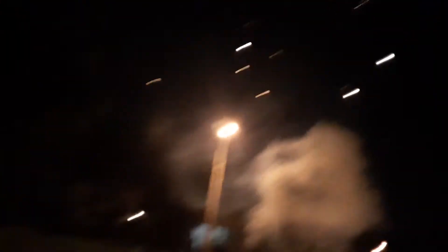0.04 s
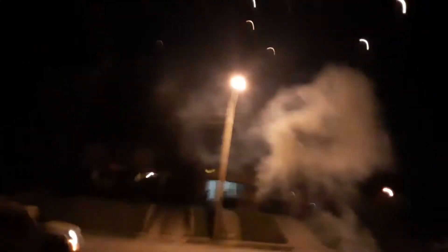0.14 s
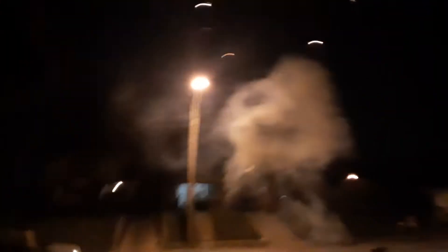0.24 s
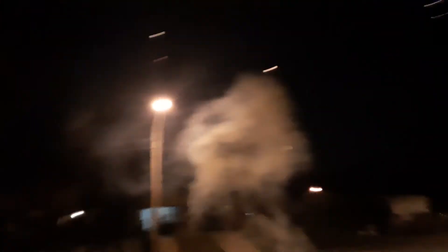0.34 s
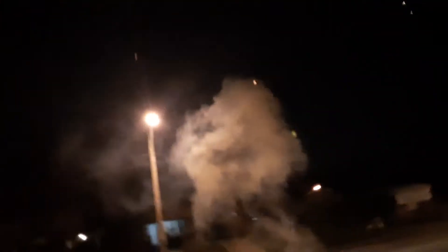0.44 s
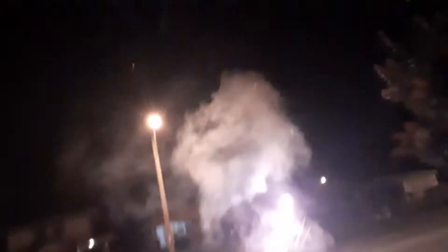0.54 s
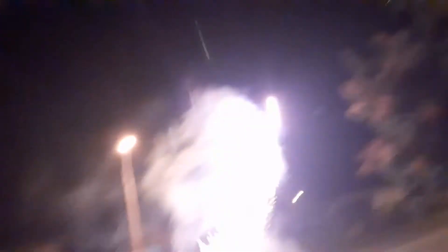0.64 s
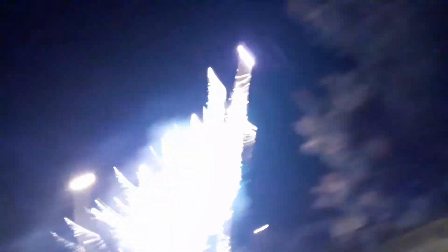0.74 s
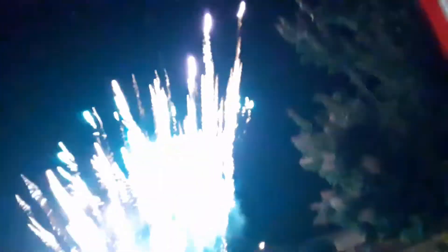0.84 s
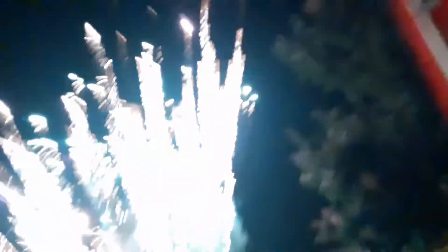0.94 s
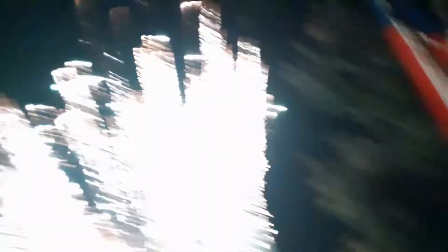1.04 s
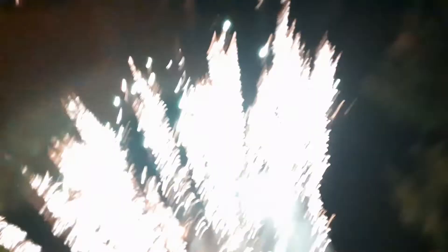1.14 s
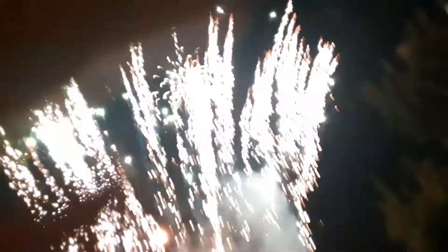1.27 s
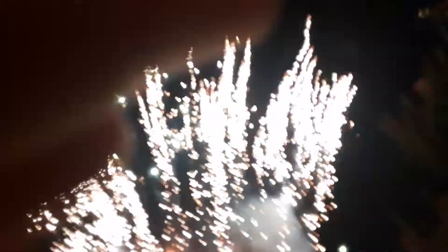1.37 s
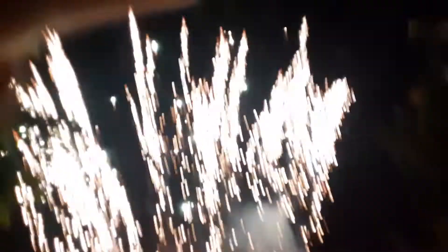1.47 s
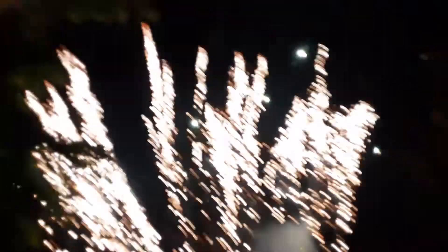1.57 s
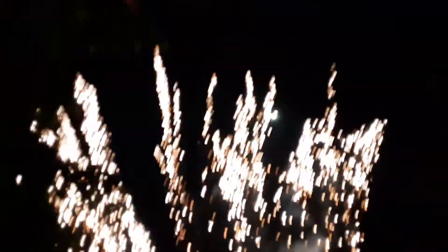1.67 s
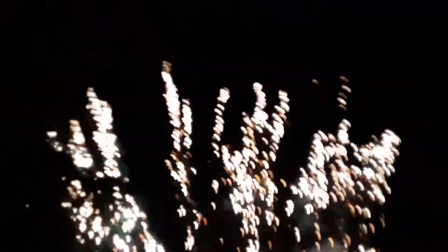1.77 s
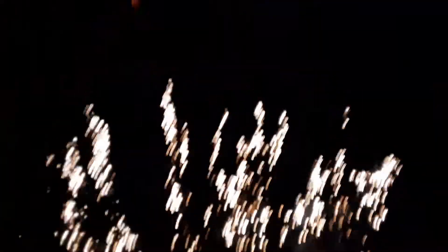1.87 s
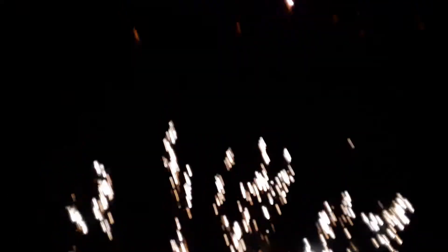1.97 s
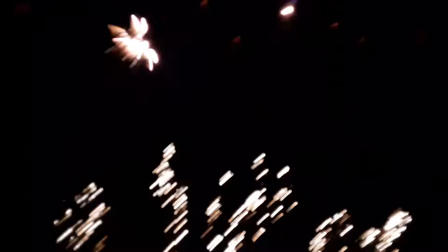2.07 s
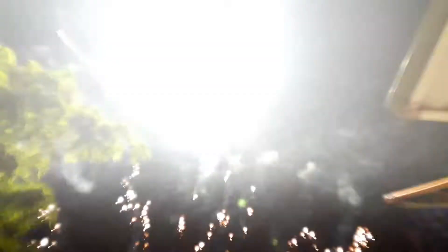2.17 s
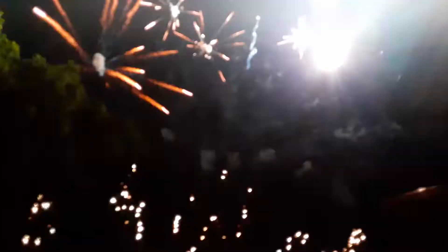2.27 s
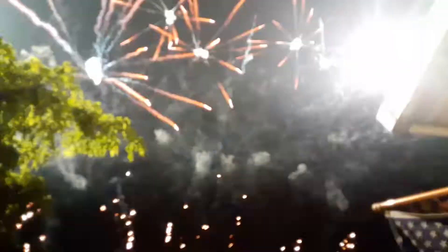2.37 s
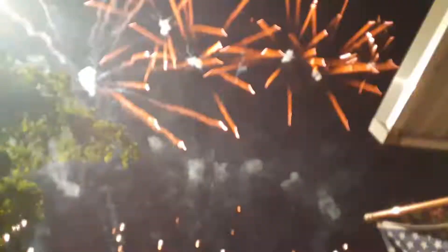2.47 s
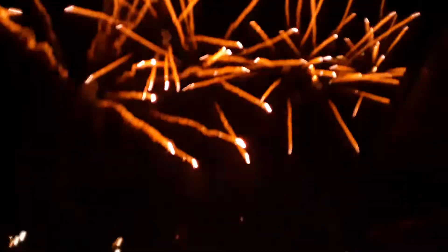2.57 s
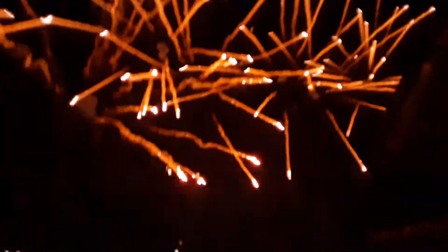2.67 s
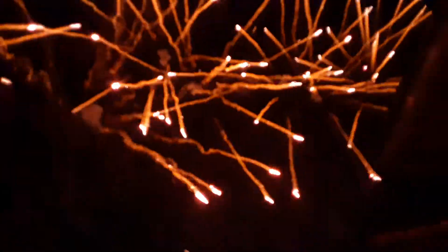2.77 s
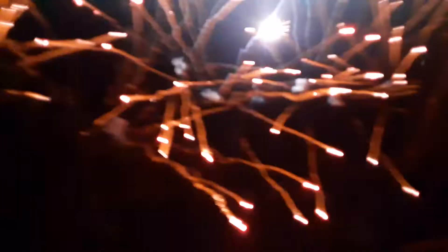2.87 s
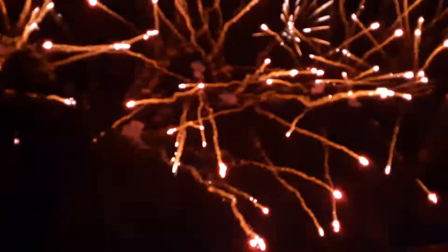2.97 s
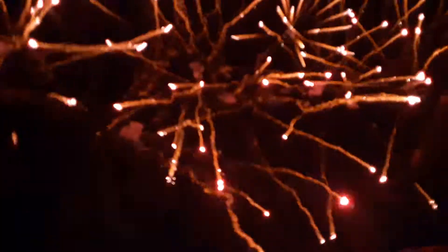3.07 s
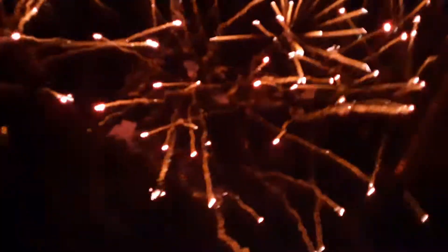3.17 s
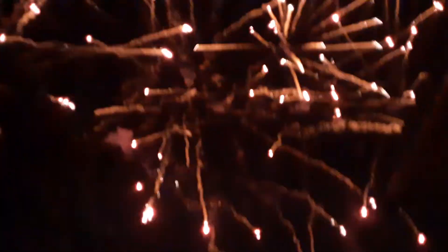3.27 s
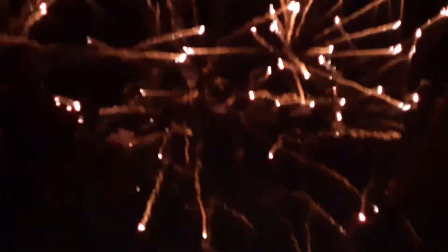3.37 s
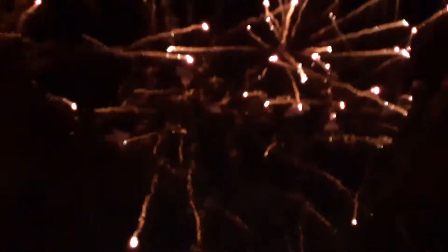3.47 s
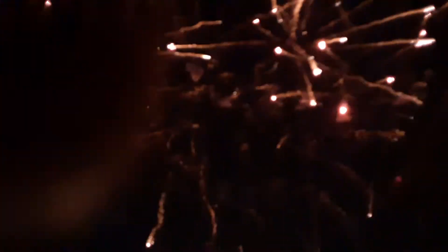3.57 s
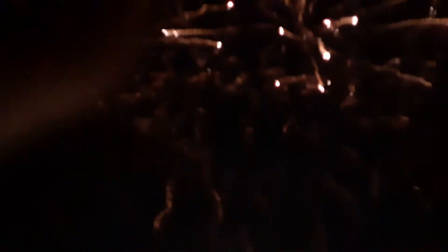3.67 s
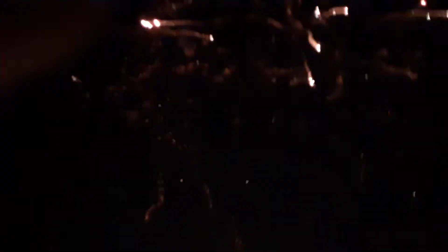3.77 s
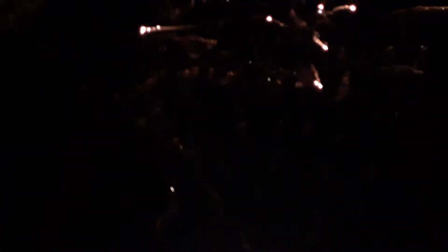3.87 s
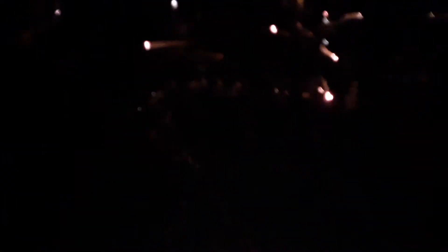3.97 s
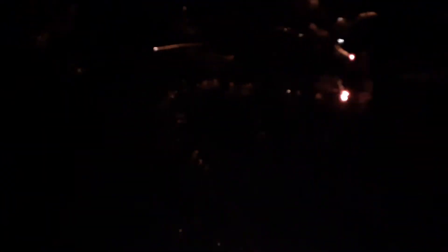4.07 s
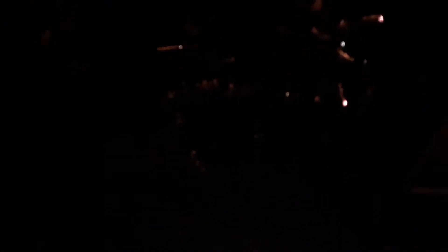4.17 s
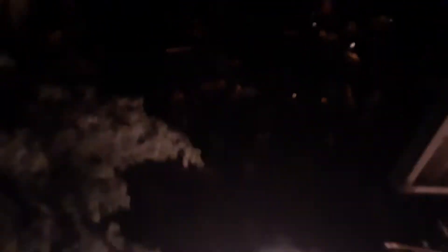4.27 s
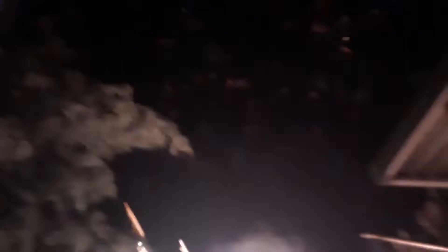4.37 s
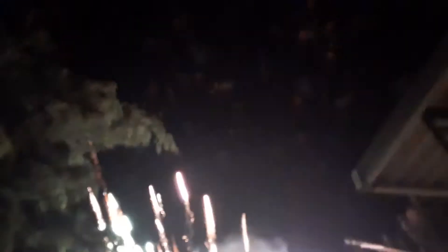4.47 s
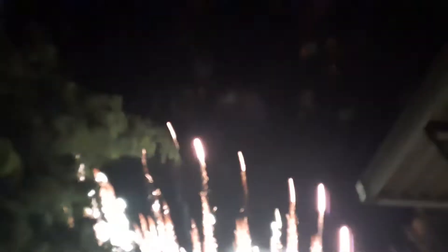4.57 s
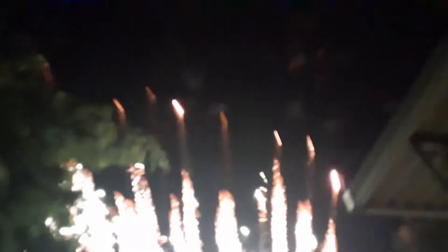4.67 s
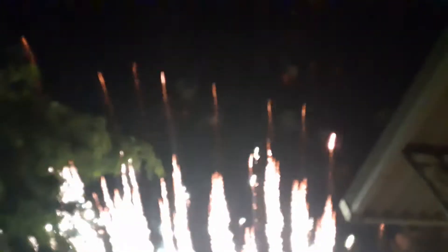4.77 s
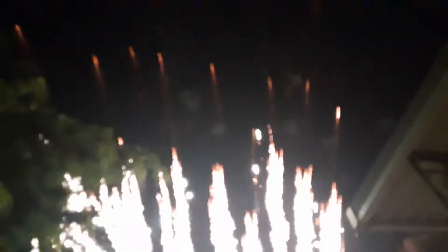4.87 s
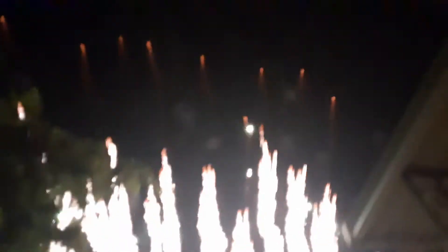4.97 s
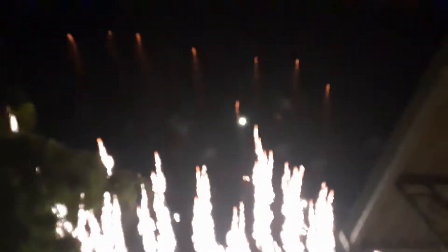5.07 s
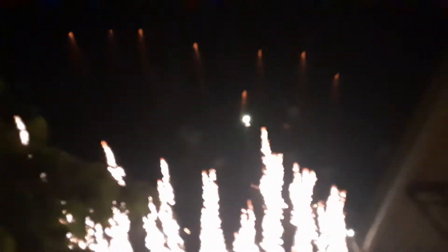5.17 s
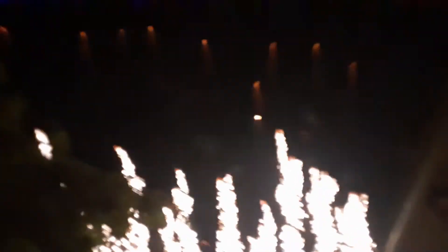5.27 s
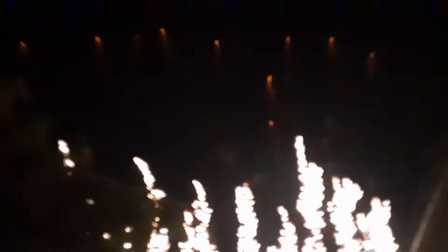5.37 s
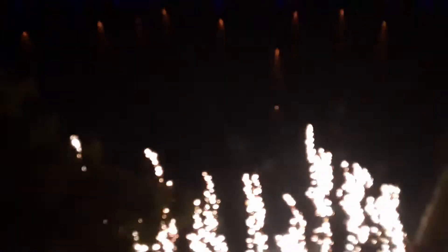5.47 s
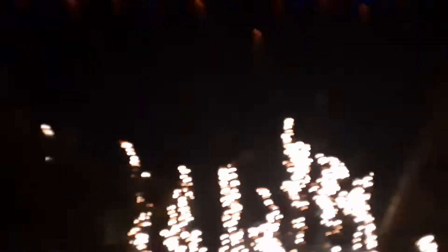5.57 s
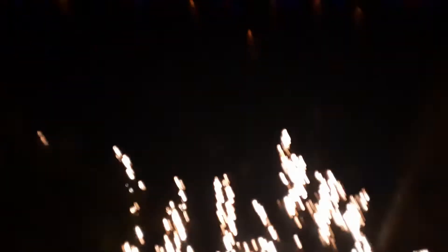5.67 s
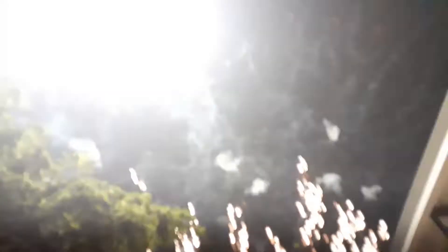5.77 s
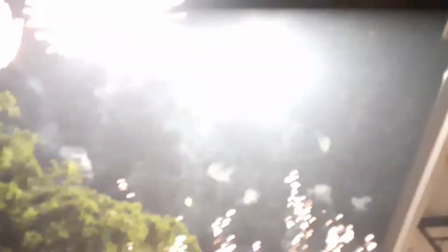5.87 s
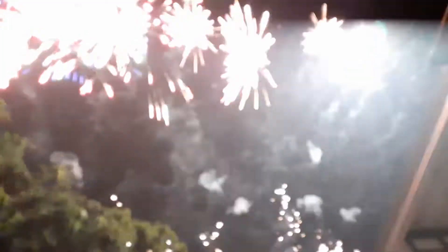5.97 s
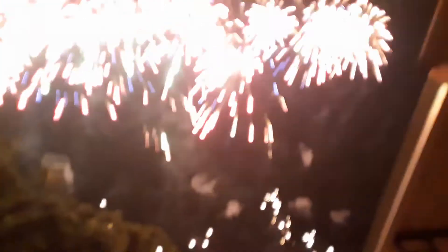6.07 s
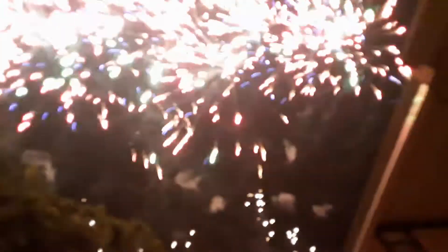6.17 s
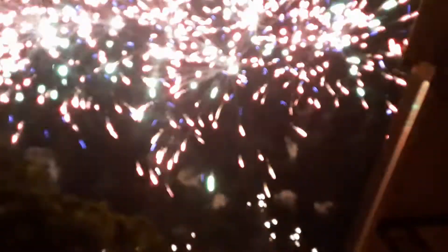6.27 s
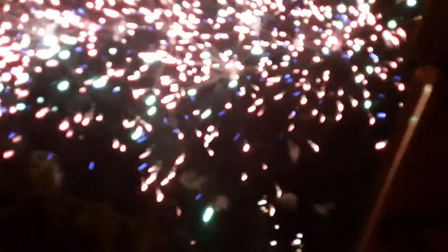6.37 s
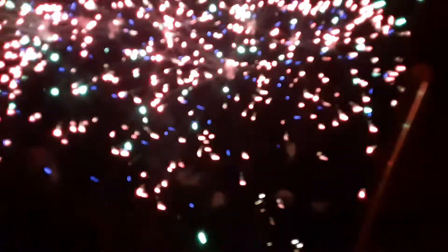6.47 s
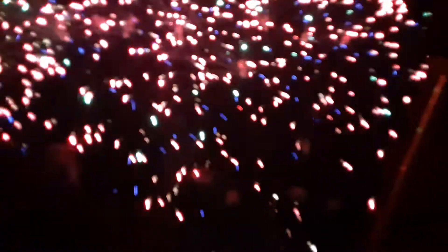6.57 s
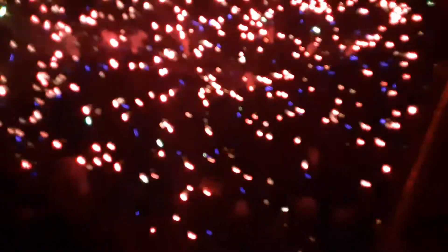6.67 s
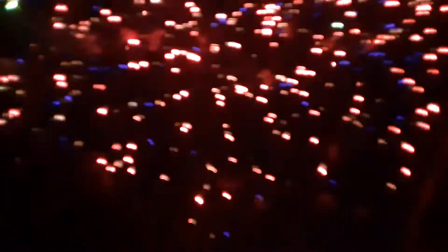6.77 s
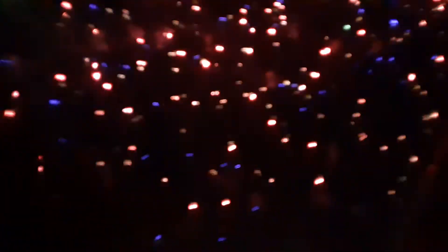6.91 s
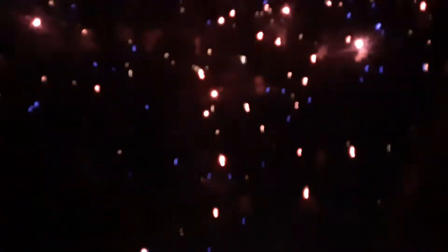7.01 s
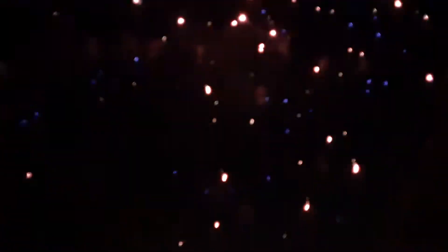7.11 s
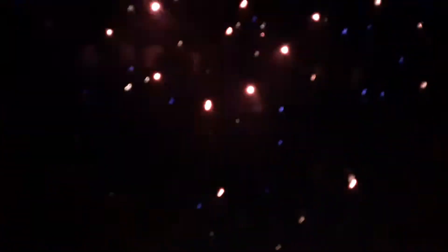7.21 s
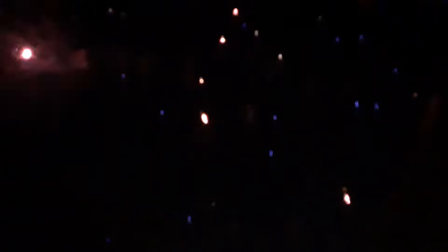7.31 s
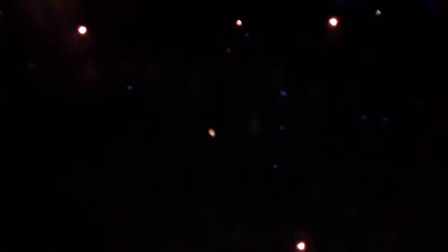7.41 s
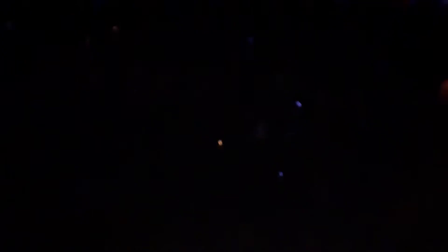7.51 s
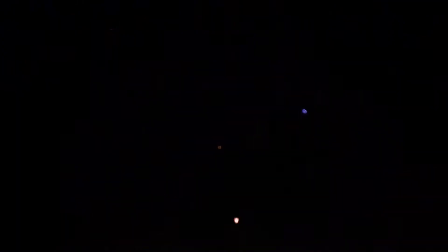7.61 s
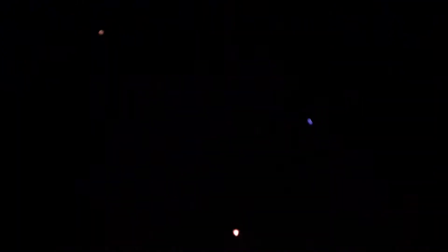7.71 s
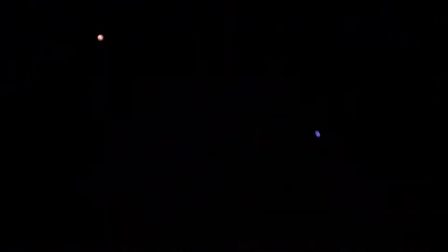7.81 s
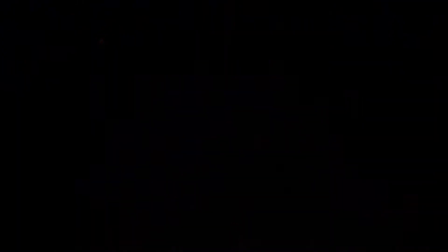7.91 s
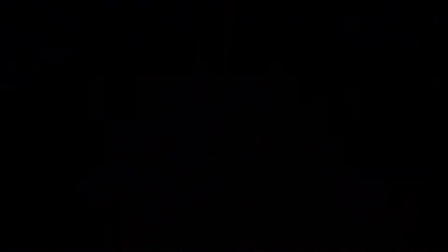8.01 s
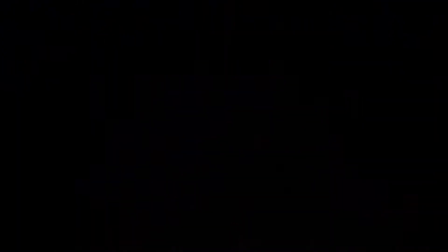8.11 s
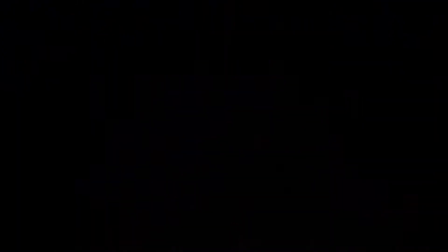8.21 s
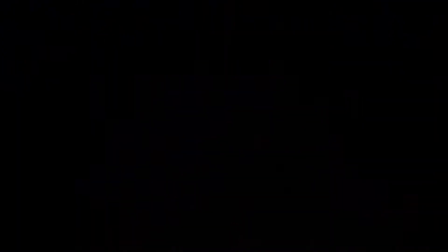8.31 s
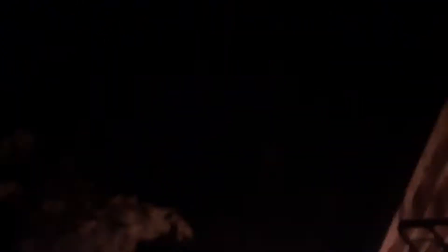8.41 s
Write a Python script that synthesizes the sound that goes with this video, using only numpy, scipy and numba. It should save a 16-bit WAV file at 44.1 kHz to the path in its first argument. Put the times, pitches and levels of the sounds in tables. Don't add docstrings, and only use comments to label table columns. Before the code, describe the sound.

A multi-shot firework a few metres away fires two fast ragged volleys, cracking and thumping from its tubes. About a second and a half after each, shells explode overhead in overlapping booms with duller distant thumps and grainy reverberation. Low rumble, air hiss, burning sizzle and a faint throbbing engine lie beneath. A handheld phone limits the peaks; the second volley is duller.

```python
import sys
import numpy as np
from scipy import signal
from scipy.fft import rfft, irfft, next_fast_len
from scipy.io import wavfile
from scipy.ndimage import uniform_filter1d, minimum_filter1d
from numba import njit

SR = 44100
rng = np.random.default_rng(int(sys.argv[2]) if len(sys.argv) > 2 else 0)


def transcribe(u):
    v = np.clip(np.atleast_2d(u).T, -1, 1)
    q = np.round(v * 32767).astype(np.int16)
    wavfile.write(sys.argv[1], SR, q)


def gain_from_decibels(decibels):
    exponent = np.asarray(decibels, float) / 20
    return 10 ** exponent


N = 372644

VOLLEY_STARTS = [.5605, 4.2354, 8.44]
# (frequency [Hz], density [dB per Hz])
BLAST_COLOUR = [(410, -6), (700, -2), (1110, 1), (2700, -2), (3320, -9), (4210, -8), (7200, -12),
                (9730, -26), (13100, -19), (16000, -32)]
NO_THUMP_DB, TUBE_NOTE_HZ = -60, 293.5


def at(table, hz, column=1):
    table = np.array(table, float)
    return np.interp(np.log(np.maximum(hz, 1)), np.log(table[:, 0]), table[:, column])


def bins(size):
    return np.arange(size // 2 + 1) * SR / size


def port_gain(pan_db):
    return gain_from_decibels(np.array([[pan_db], [-pan_db]]) / 2)


def noise(spectrum, shape):
    # (frequency [Hz], coherence [0-1])
    coherence = [(40, 0.6), (80, 1), (150, 0.96), (350, 0.82), (700, 0.31), (1400, 0), (16000, 0)]
    size = len(shape)
    hz = bins(size)
    mid, side = rfft(rng.standard_normal((2, size)) * shape) * gain_from_decibels(at(spectrum, hz))
    alike = np.clip(at(coherence, hz), 0, 1)
    mid, side = mid * np.sqrt(1 + alike), side * np.sqrt(1 - alike)
    x = irfft(np.array([mid + side, mid - side]), size)
    return x * np.sqrt(np.mean(shape ** 2) / np.mean(x ** 2))


def walk(rate, size):
    hold = int(SR / rate)
    steps = np.repeat(rng.standard_normal(300), hold)
    return 0.74 * uniform_filter1d(np.resize(steps, size), hold)


def band(x, hz, width):
    return signal.lfilter(*signal.iirpeak(hz, hz / width, fs=SR), x)


def flames():
    # (time of peak [s], level [dB], swell [dB per s], fade [dB per s])
    burns = [
        (1.45, -50.5, 12, 28.5),
        (3.499, -61, 5.5, 5),
        (4.22, -62, 17, 24),
        (4.9, -70, 36, 1),
        (8.45, -51.5, 29, 50),
    ]
    t, total = np.arange(N) / SR, 0
    for s, db, swell, fade in burns:
        slope_db = np.where(t < s, swell * (s - t), fade * (t - s))
        total = total + gain_from_decibels(db - slope_db)
    return total


def night_air(flame):
    # (time [s], level [dB])
    ambience = [(0, -43.5), (.3, -44.5), (.46, -40), (.56, -37), (1.5, -46), (2.1, -45.5), (3.5, -48.5),
                (4.3, -40), (5.4, -50), (5.65, -47.5), (5.9, -43), (7.1, -49.5), (7.5, -46.5), (7.9, -44),
                (8.45, -34)]
    # (frequency [Hz], density [dB per Hz])
    rumble_colour = [(15, -67), (25, -14), (65, -9.5), (107, -4), (170, -8.5), (335, -3.5), (401, -9.5),
                     (583, -16.5), (697, -17.5), (900, -32), (1170, -41), (1980, -120)]
    # (frequency [Hz], density [dB per Hz])
    hiss_colour = [(290, -56), (500, -19), (733, -6), (833, -0.5), (1180, -2.5), (1320, -3.5), (2160, -3.5),
                   (3430, -21.5), (6490, -31), (8000, -41), (10400, -61), (17600, -120)]
    hiss_db, thinning_db_per_s, roar_db = -7, -0.76, 4
    t, even = np.arange(N) / SR, np.ones(2 ** 19)
    air_db = np.interp(t, *np.transpose(ambience))
    rumble = noise(rumble_colour, even)[:, :N] * gain_from_decibels(air_db + 2.2 * walk(12, N))
    hiss_level = np.hypot(gain_from_decibels(air_db + hiss_db + thinning_db_per_s * t), gain_from_decibels(roar_db) * flame)
    hiss = noise(hiss_colour, even)[:, :N] * hiss_level * gain_from_decibels(2.2 * walk(31, N))
    return rumble + hiss


def engine():
    # (time [s], level [dB])
    engine_level = [(0, -54), (.5, -51.5), (1.9, -48), (3.5, -44.5), (4.2, -36.5), (5.0, -47), (6.8, -49.5),
                    (7.4, -63), (8.45, -38)]
    phase = 2 * np.pi * np.cumsum(110 + 9 * walk(14, N) + 6 * walk(1.5, N)) / SR
    throb = 1 + .6 * np.sin(phase / 6 + 4 * walk(4, N))
    level_db = np.interp(np.arange(N) / SR, *np.transpose(engine_level))
    return np.sin(phase) * throb * gain_from_decibels(level_db + 3.4 * walk(20, N))


def fuse(flame):
    # (frequency [Hz], density [dB per Hz])
    sizzle_colour = [(1470, -29), (2500, -4.5), (3520, -3.5), (3830, -5.5), (4690, -7), (6450, -10.5),
                     (8200, -13), (9360, -33), (12300, -20.5), (16000, -28)]
    whistle_db, growth_db_per_s = -40, 30
    sizzle = noise(sizzle_colour, np.ones(2 ** 19))[:, :N] * flame * gain_from_decibels(1.0 * walk(280, N))
    to_shot = np.arange(N) / SR - VOLLEY_STARTS[0]
    whistle = band(rng.standard_normal(N), 3080, 50)
    whistle = whistle * gain_from_decibels(whistle_db + growth_db_per_s * np.minimum(to_shot, 0)) * (to_shot < 0)
    return sizzle + whistle


def tail(spectrum, roll, rise, grain_db, rate, size):
    t, hz = np.arange(size) / SR, bins(size)
    sound = rfft(noise(spectrum, np.ones(size)))
    clumps, out = walk(rate, size), 0
    for centre in 31.25 * 2 ** np.arange(10):
        share = np.clip(1 - abs(np.log2(np.maximum(hz, 1) / centre)), 0, 1)
        early, late, late_db = (at(roll, centre, column=c) for c in (1, 2, 3))
        decay = np.sqrt(gain_from_decibels(-120 * t / early) + gain_from_decibels(2 * late_db - 120 * t / late))
        build = 1 - np.exp(-t / rise * max(centre / 400, 1))
        grain = gain_from_decibels(grain_db * (clumps + 0.25 * walk(rate, size)))
        out = out + irfft(sound * share, size) * decay * build * grain
    return out


def bangs(events, colour, echoes, roll, crack_s, lag_s, ring_s, boom_db, spit_db,
          dip_s=0., shock_db=-3, shock_s=0.00033, rise_s=.0001):
    aimed_away = [.6162, .639, .7101, .7887, .817, 2.266, 2.325, 4.2542, 6.029, 8.1184, 8.2082, 4.297,
                  4.3005, 4.3195, 4.3478, 4.4403, 4.4585]
    away_hz, away_share = 3900, .35
    crack_width, crack_crest, even_colour, echo_spread = .85, 1.55, .6, .03
    size, lead = 2 ** 12, 2 ** 9
    t = (np.arange(size) - lead) / SR
    after = np.maximum(t, 0)
    front = (t >= 0) * (np.exp(-(after / crack_s) ** 2) + .15 * np.exp(-after / (4 * crack_s)))
    front = front * (1 - np.exp(-after / rise_s))
    spit = gain_from_decibels(spit_db) * np.exp(np.minimum(t, 0) / .008) * (t < 0) * (t > -.0065)

    late = np.maximum(t - lag_s, 0)
    ring = np.exp(-late / ring_s) + 0.098 * np.exp(-late / (4 * ring_s))
    ring = ring * (1 - np.exp(-(late / (.0003 + .72 * dip_s)) ** 2))
    boom = np.sin(2 * np.pi * 105 * late + np.array([[.85], [-.7]]))
    boom = boom * np.exp(-late / .009) * (1 - np.exp(-late / .003))

    even = gain_from_decibels(at(colour, bins(size)))
    shock = np.roll(irfft(even, size), lead + int(shock_s * SR))
    shock = gain_from_decibels(shock_db) * shock / shock.max()
    gate = np.minimum(np.exp(np.minimum(t, 0) / .0002) + gain_from_decibels(spit_db + 22), 1)
    paths, feed = np.zeros((1 + len(echoes), 2, N + SR)), np.zeros((1, N))
    for s, crack_db, thump_db, hz, pan_db, tail_db in events:
        crack = noise(colour, (front + spit) * gain_from_decibels(0.21 * walk(3000, size)))
        tone = rfft(crack)
        levelling = (even / uniform_filter1d(abs(tone), size=31)) ** even_colour
        crack = irfft(tone * levelling, size) * np.exp(-after / (5 * crack_s))
        mid = crack.mean(axis=0)
        crack = mid + crack_width * (crack - mid)
        crack = crack * np.sqrt(np.sum(front ** 2) / np.sum(mid ** 2)) / crack_crest
        crack = (crack + shock) * gate
        if s in aimed_away:
            crack = away_share * crack + signal.lfilter(*signal.butter(3, away_hz, fs=SR), crack)
        thump = np.sin(2 * np.pi * hz * (late - dip_s)) * ring + gain_from_decibels(boom_db) * boom
        bang = gain_from_decibels(crack_db - 2.0) * crack + gain_from_decibels(thump_db + 3) * thump
        stretch = 1 + echo_spread * rng.standard_normal()
        for path, delay in zip(paths, [0] + [row[0] for row in echoes]):
            i = int((s + delay * stretch) * SR) - lead
            path[:, i:i + size] += bang * port_gain(pan_db)
        feed[0, int(s * SR)] = gain_from_decibels(tail_db)
    out = paths[0, :, :N] + signal.fftconvolve(feed, roll, axes=1)[:, :N]
    for path, (delay, hz, width, db) in zip(paths[1:], echoes):
        out = out + gain_from_decibels(db) * band(band(path[:, :N], hz, width), hz, 2 * width)
    return out, feed


def thump_note(hz):
    return hz + 20 * rng.standard_normal()


def sky_pan():
    return -0.5 + 4 * rng.standard_normal()


def far_reverberation():
    # (frequency [Hz], density [dB per Hz])
    far_colour = [(24, -43), (40, -14), (227, 3), (271, -8), (314, 9.5), (493, -17), (979, -24),
                  (2600, -33), (3000, -41), (3900, -69.5), (6600, -120)]
    # (frequency [Hz], early t60 [s], late t60 [s], late share [dB])
    far_decay = [(100, 0.27, 0.89, -8.5), (1000, 0.073, 1, -2)]
    return tail(far_colour, far_decay, rise=0.0087, grain_db=0.0, rate=19, size=2 ** 16)


def far_bangs(roll):
    # (time [s], thump [dB], thump note [Hz], tail [dB])
    distant = [(0.507, -34, 350, -45), (2.755, -12, 327, -28.5), (2.879, -20, 294, -42),
               (3.19, -19.5, 334, -31), (3.41, -31, 320, -30), (5.547, -31.5, 105, -54),
               (5.686, -38, 206, -46), (6.322, -14.5, 357, -45), (6.433, -20.5, 343, -44),
               (7.031, -38, 350, -43), (8.063, -26, 336, -25.5), (8.085, -29, 283, -47),
               (8.105, -33, 300, -35), (8.158, -43, 319, -37), (8.307, -36, 318, -53),
               (5.9418, -12, 334, -34), (5.957, -12.5, 320, -41), (5.968, -21, 315, -28),
               (6.037, -18, 320, -45), (6.107, 1, 332, -49), (6.137, -9.5, 273, -47),
               (6.275, -19, 278, -52), (2.408, -17, 346, -45), (2.562, -7, 302, -47),
               (2.654, -17, 315, -42), (2.71, -26, 301, -45), (6.2291, -6.5, 329, -45),
               (6.151, -13, 315, -45), (6.184, -11, 325, -45), (2.1275, -13, 310, -47),
               (2.2983, -9, 333, -47), (2.313, -14, 300, -47), (2.328, -12, 290, -47),
               (2.386, -15, 319, -47), (2.525, -12, 310, -49), (2.629, -9.5, 320, -47),
               (5.9142, -11, 315, -47), (6.016, -10, 310, -47), (6.071, -14, 320, -47)]
    far_crack_db = -35
    rows = [(s, thump + far_crack_db, thump, hz, sky_pan(), wash) for s, thump, hz, wash in distant]
    return bangs(rows, BLAST_COLOUR, [], roll, crack_s=0.0018, lag_s=0.00053, ring_s=0.01,
                 boom_db=-19.0, spit_db=-14)[0]


def stray_cracks(roll):
    # (time [s], crack [dB], left minus right [dB])
    stray_events = [(2.3145, -15, 0), (2.3855, -14, 0), (2.42, -16, 0), (2.4305, -13, 0), (2.545, -18, 0),
                    (4.372, -17, 0), (4.434, -15, 0), (5.9435, -15, 0), (6.024, -14, 0), (6.116, -15, 0),
                    (8.1184, -38, 0), (8.2082, -38, 2), (8.4335, -28, 0)]
    rows = [(s, crack, NO_THUMP_DB, TUBE_NOTE_HZ, pan, crack - 40) for s, crack, pan in stray_events]
    return bangs(rows, BLAST_COLOUR, [], roll, crack_s=.0015, lag_s=.001, ring_s=.003,
                 boom_db=-9, spit_db=-60)[0]


def pings():
    # (time [s], peak [dB], pitch [Hz], left minus right [dB])
    ribbed_returns = [(1.1453, -31, 2240, 6), (1.2012, -36, 2100, 6), (2.139, -16, 2250, -4),
                      (2.5051, -25, 2150, 0), (2.5155, -14.5, 2010, 9), (2.6436, -15.5, 2070, 10),
                      (3.0976, -20, 1440, 4), (4.9095, -45, 1640, 0), (4.9734, -42, 2000, 0),
                      (4.9955, -39, 1700, 0), (5.021, -37, 1730, 0), (8.1184, -41, 2580, -2),
                      (8.2082, -41, 2490, 2)]
    t, out = np.arange(2 ** 10) / SR, np.zeros((2, N))
    for s, db, hz, pan_db in ribbed_returns:
        blip = np.sin(2 * np.pi * hz * t) * t / 0.0011 * np.exp(1 - t / 0.0013)
        i = int(s * SR)
        out[:, i:i + len(t)] += blip * gain_from_decibels(db - 1.0) * port_gain(pan_db)
    return out


def near_reverberation():
    # (frequency [Hz], density [dB per Hz])
    near_colour = [(180, -14), (300, 6), (856, 1), (1560, -1), (1690, 12.5), (1970, 6), (6300, -1),
                   (10000, -21.5), (16000, -24)]
    # (frequency [Hz], early t60 [s], late t60 [s], late share [dB])
    near_decay = [(300, 0.18, 0.11, -6), (3000, 0.2, 0.46, -4.5), (14100, 0.098, 0.28, 14)]
    return tail(near_colour, near_decay, rise=0.0013, grain_db=4, rate=106, size=2 ** 15)


def hill_echo(feed, roll):
    delay = int(1.452 * SR)
    smear = roll * np.minimum(np.arange(2 ** 15) / (0.012 * SR), 1)
    hill = signal.fftconvolve(np.pad(feed, ((0, 0), (delay, 0))), smear, axes=1)
    return gain_from_decibels(-29) * band(hill[:, :N], 2150, 410)


def star_snaps(roll):
    # (time [s], crack [dB], left minus right [dB], tail [dB])
    snap_events = [
        (1.2893, -10, -4, -31),
        (1.2967, -15, 6, -35),
        (1.3012, -11, -7, -35),
        (1.306, -11, 7, -33),
        (1.3134, -14, 3, -34),
        (4.1057, -39, 3, -62),
    ]
    # (frequency [Hz], density [dB per Hz])
    snap_colour = [(200, -8), (800, 0), (1800, 0), (6500, -3), (9700, -15.5), (13000, -13), (16000, -56)]
    rows = [(s, crack, NO_THUMP_DB, TUBE_NOTE_HZ, pan, wash) for s, crack, pan, wash in snap_events]
    return bangs(rows, snap_colour, [], roll, crack_s=.001, lag_s=.001, ring_s=.003, boom_db=-9,
                 spit_db=-60, shock_db=3, shock_s=.0001, rise_s=.00003)[0]


def shell_bursts():
    # (time [s], crack [dB], thump [dB], tail [dB])
    burst_events = [(2.1185, -3, -6, -10.5), (2.266, -13, -11, -15), (2.2968, -1, -3.5, -14),
                    (2.325, -14, -12, -17), (2.377, 0, -4, -14), (2.3955, -11, -9, -18),
                    (2.412, -10, -8, -18), (2.4925, -6, -6, -12), (2.6212, -2, -4, -14),
                    (3.0, -7, -4.5, -14), (5.9057, -3, -4, -10), (5.9323, -12, -8, -17),
                    (6.0066, -3, -4, -12), (6.029, -8, -9, -17), (6.063, -8, -8, -16), (6.1, -4, -7, -15),
                    (6.1643, -9, -8, -21), (6.177, -8, -8, -22), (6.2275, -24, -12, -27)]
    # (delay [s], centre [Hz], width [Hz], level [dB])
    burst_reflections = [(.0089, 450, 1400, 1), (.0089, 4500, 7000, -6), (.0185, 400, 1000, -4),
                         (.031, 320, 600, -8), (.053, 330, 900, -8), (.135, 700, 1500, -14)]
    # (frequency [Hz], density [dB per Hz])
    burst_colour = [(18, -80), (30, -48), (93, -6.5), (199, -8.5), (328, 0), (404, -6.5), (512, -9.5),
                    (616, -14.5), (866, -23), (1500, -27), (2230, -26.5), (3100, -31.5), (7270, -36.5),
                    (9460, -52), (12600, -50), (16000, -54)]
    # (frequency [Hz], early t60 [s], late t60 [s], late share [dB])
    burst_decay = [(40, 0.48, 2.74, -20), (294, 0.44, 1.89, -10), (1550, 0.69, 1.804, 1),
                   (6160, 0.37, 1.71, -3), (14600, 1, 0.48, 11)]
    roll = gain_from_decibels(2.0) * tail(burst_colour, burst_decay, rise=.02, grain_db=1.0, rate=45, size=2 ** 17)
    rows = [(s, crack, thump, thump_note(279), sky_pan(), wash) for s, crack, thump, wash in burst_events]
    return bangs(rows, BLAST_COLOUR, burst_reflections, roll, crack_s=.002, lag_s=.0009, ring_s=.0025,
                 boom_db=-6, spit_db=-55, shock_db=-2, shock_s=.0017, rise_s=.0003)[0]


def lift_charges():
    # (time [s], crack [dB], thump [dB], left minus right [dB])
    lift_events = [(.5605, -7, -6, -2), (.5906, -6, -6, 1), (.6162, -7, -5, 0), (.639, -7, -4.5, -1),
                   (.6628, -8, -15, 0), (.666, -7, -6, 3), (.685, -8, -5.5, 2), (.7101, -4, -4, 1),
                   (.7384, -5, -7, -1), (.768, -7, -6, -3), (.7887, -7, -14, 3), (.7966, -6, -6, -3),
                   (.817, -12, -15, 3), (4.2354, -7, -5, 2), (4.2542, -8, -6, -2), (4.2767, -4, -6, 3),
                   (4.297, -7, -8, -2), (4.3005, -8, -9, 4), (4.3195, -7, -11, -1), (4.3283, -5, -5.5, -2),
                   (4.3478, -9, -9, 3), (4.3545, -18, -5.5, -2), (4.3764, -4, -5.5, -1),
                   (4.3953, -7, -6, 3), (4.4143, -6, -5, 1), (4.4403, -10, -5.5, 1), (4.4585, -12, -11, -2),
                   (8.4406, -5, -6, 1)]
    # (frequency [Hz], density [dB per Hz])
    muzzle_colour = [(400, -6), (560, -2.5), (800, 2.5), (2000, -3), (3400, -4.5), (4600, -10),
                     (7200, -9.5), (9700, -25.5), (13000, -16.5), (16000, -37)]
    # (delay [s], centre [Hz], width [Hz], level [dB])
    ground_reflection = [(.0027, 2800, 2400, -6)]
    # (frequency [Hz], density [dB per Hz])
    lift_colour = [(18, -79), (30, -14), (100, -1.5), (150, -4.5), (215, -4), (336, -3.5), (450, -15),
                   (554, -19), (800, -20), (2170, -21), (2610, -28), (3140, -25.5), (4080, -30),
                   (7270, -29.5), (9460, -43), (14000, -34), (16000, -39)]
    # (frequency [Hz], early t60 [s], late t60 [s], late share [dB])
    lift_decay = [(40, 0.27, 2, -41), (303, 0.38, 1.13, -10.5), (1510, 0.059, 1.27, -8),
                  (2300, 0.16, 1.45, -10.5), (5870, 0.21, 1.16, -7.5), (13800, 0.19, 0.74, -10.5)]
    volley_treble = [2, -4, -13]
    tube_db, tail_db, sag_db_per_s = 6.5, -16.5, -25.5
    roll = gain_from_decibels(5.5) * tail(lift_colour, lift_decay, rise=.022, grain_db=0.0, rate=98.0, size=2 ** 17)
    rows = []
    for s, crack, thump, pan in lift_events:
        since_start = min(s - start for start in VOLLEY_STARTS if start <= s)
        wash = tail_db + sag_db_per_s * since_start
        rows.append((s, crack, thump + tube_db, thump_note(TUBE_NOTE_HZ), pan, wash))
    lifts, feed = bangs(rows, muzzle_colour, ground_reflection, roll, crack_s=.0023, lag_s=.0013,
                        ring_s=.0036, boom_db=-17, spit_db=-19, dip_s=.0017)
    volley = np.searchsorted(VOLLEY_STARTS[1:], np.arange(N) / SR + .05)
    treble = signal.filtfilt(*signal.butter(2, 6700, "high", fs=SR), lifts)
    return lifts + (gain_from_decibels(np.array(volley_treble))[volley] - 1) * treble, feed


def scene():
    flame = flames()
    night = night_air(flame) + engine() + fuse(flame)
    far_roll, near_roll = far_reverberation(), near_reverberation()
    lifts, feed = lift_charges()
    loud = lifts + shell_bursts() + star_snaps(near_roll) + far_bangs(far_roll) + stray_cracks(far_roll)
    loud = signal.lfilter(*signal.butter(2, 60, "high", fs=SR), loud)
    return loud + hill_echo(feed, near_roll) + pings() + night


@njit
def limiter(x, top, release):
    gain, e = np.empty(len(x)), 0.
    for i in range(len(x)):
        e = max(x[i], e * release)
        gain[i] = top / max(e, top)
    return gain


def top_cut(x):
    return signal.sosfilt(signal.butter(12, 16990, fs=SR, output="sos"), x)


def record(dry):
    # (frequency [Hz], left minus right [dB])
    port_lean = [(60, -4.5), (110, 3), (200, 2), (380, 0), (700, 2), (1290, 1.5), (2380, 0), (4400, 0),
                 (8120, -1.5), (15000, 6.5)]
    # (frequency [Hz], density [dB per Hz])
    mic_hiss = [(2350, -44), (4000, -6.5), (6740, -3.5), (8360, -5), (9440, -20), (12500, -8), (16000, -10)]
    size = next_fast_len(N)
    lean = at(port_lean, bins(size)) / 2
    x = irfft(rfft(dry, size) * gain_from_decibels(np.array([lean, -lean])), size)[:, :N]
    x = x + gain_from_decibels(-68) * noise(mic_hiss, np.ones(size))[:, :N]
    x = signal.sosfilt(signal.butter(3, 55, "high", fs=SR, output="sos"), x)
    x = signal.sosfilt(signal.ellip(8, .2, 52, 15900, fs=SR, output="sos"), x)
    ahead = -minimum_filter1d(-abs(x).max(axis=0), size=65)
    gain = limiter(ahead, 1., np.exp(-1 / (0.037 * SR)))
    x = x * uniform_filter1d(gain, size=33)
    return top_cut(np.clip(x, -1, 1))


dry = scene()
out = record(dry)
transcribe(out)
```